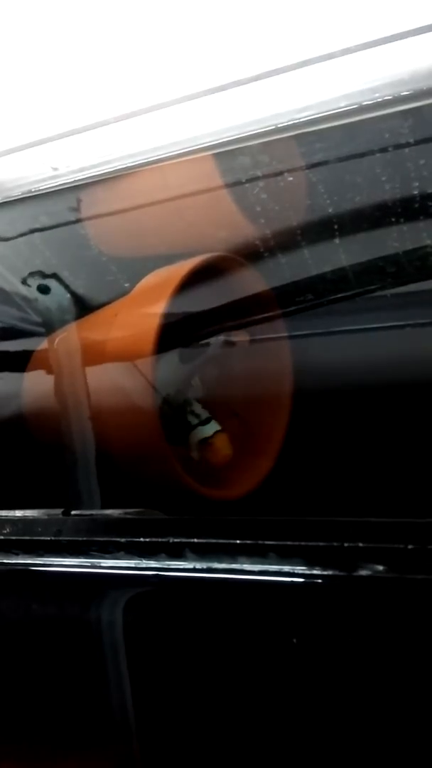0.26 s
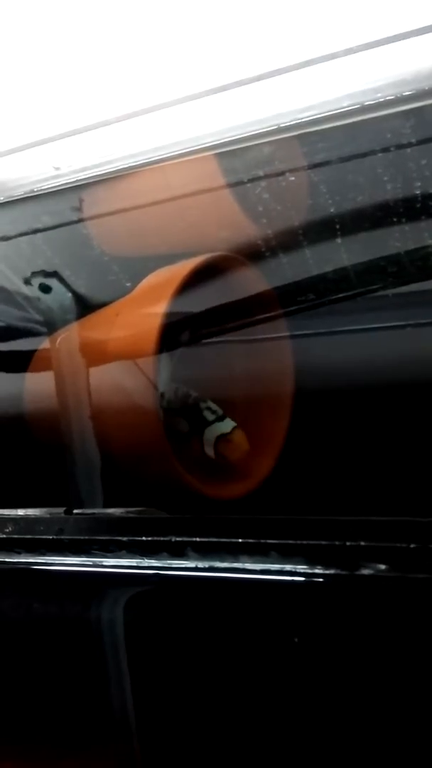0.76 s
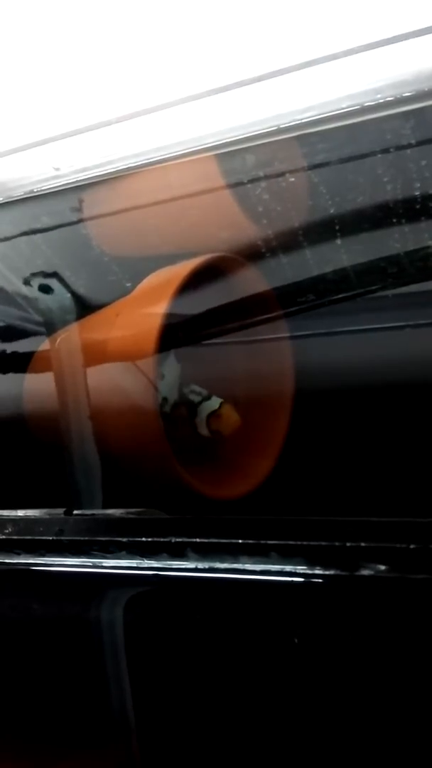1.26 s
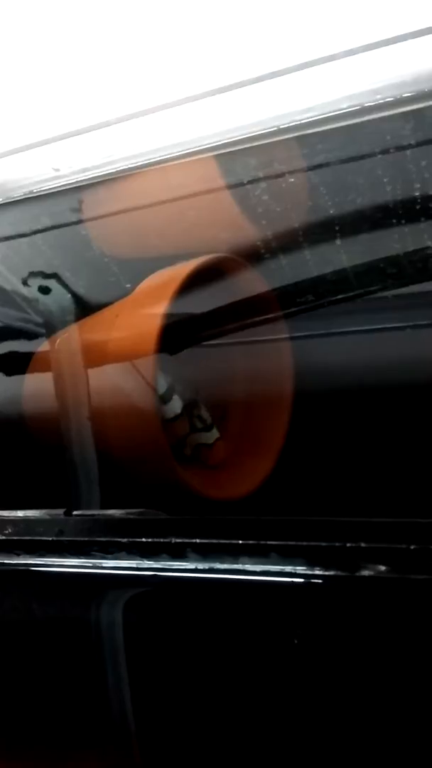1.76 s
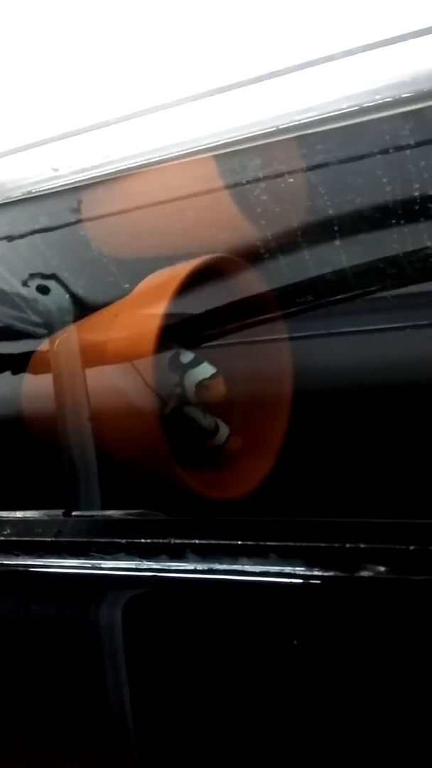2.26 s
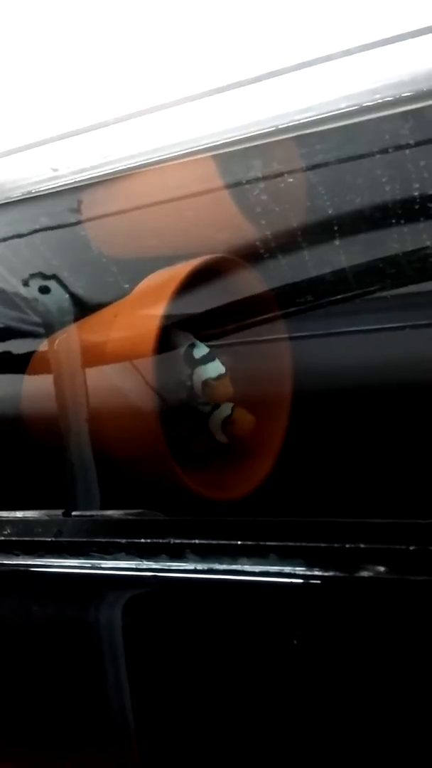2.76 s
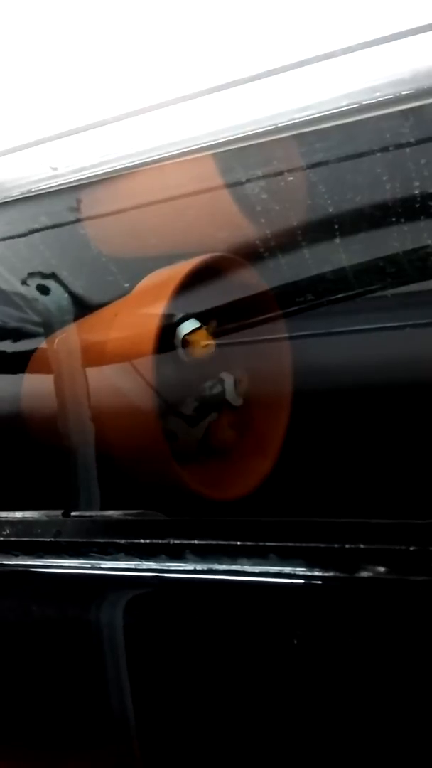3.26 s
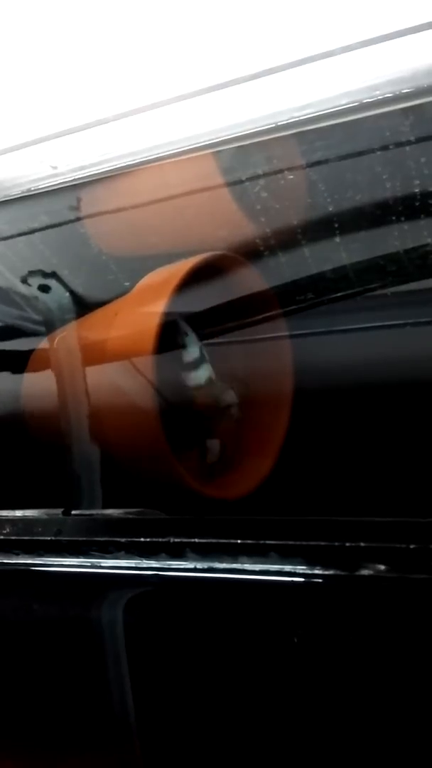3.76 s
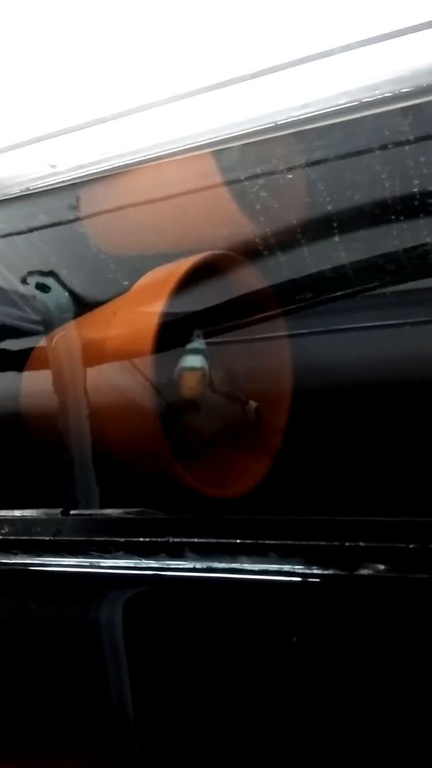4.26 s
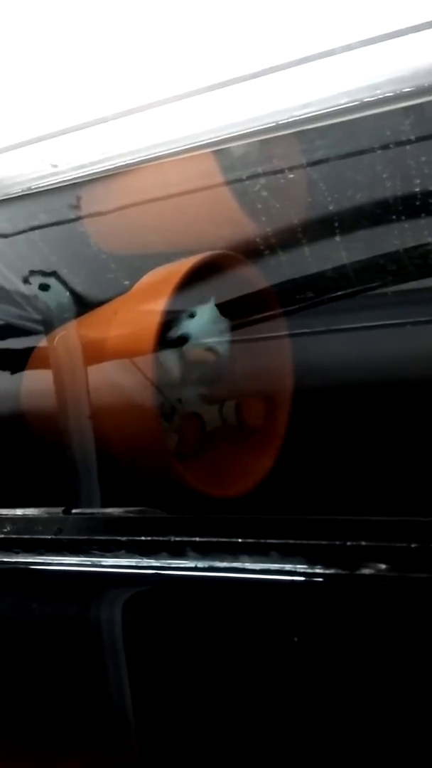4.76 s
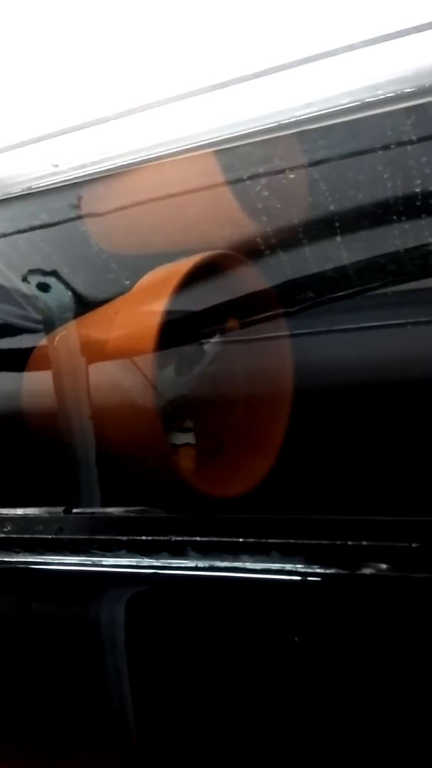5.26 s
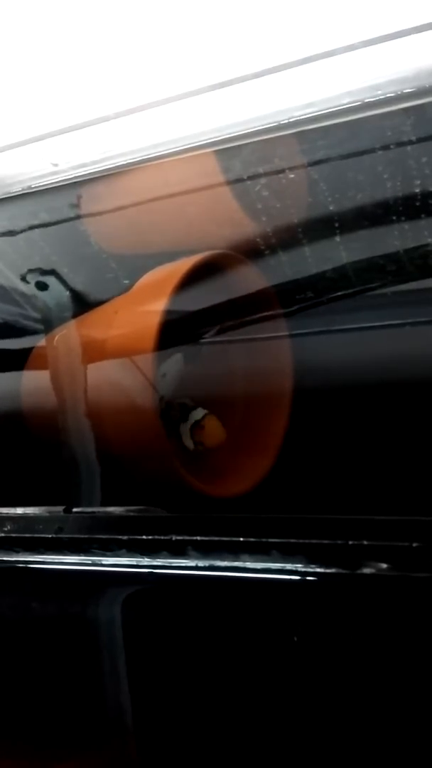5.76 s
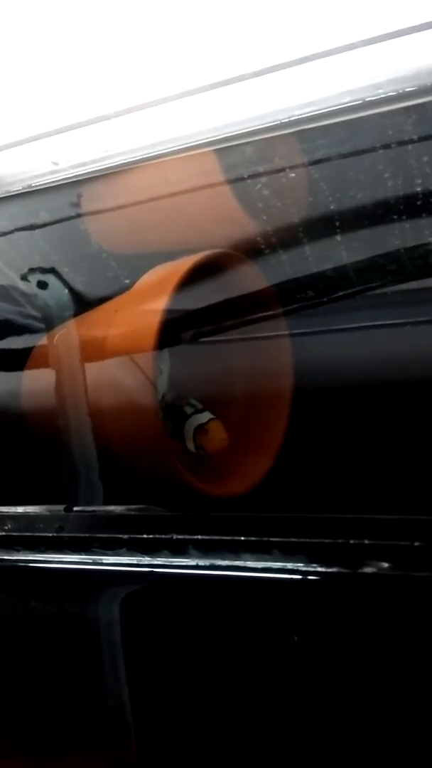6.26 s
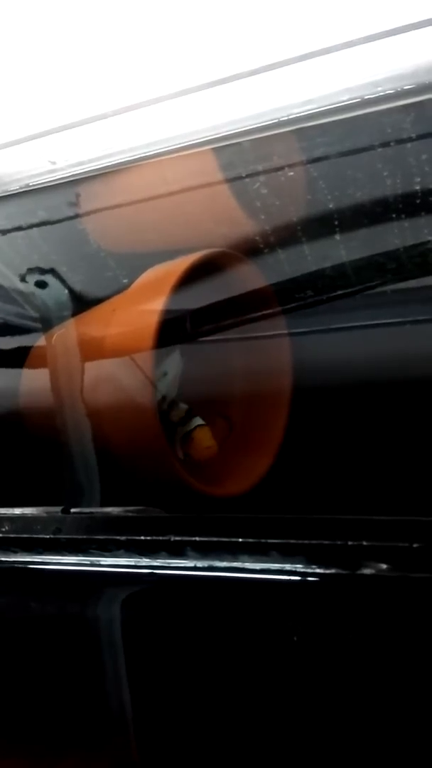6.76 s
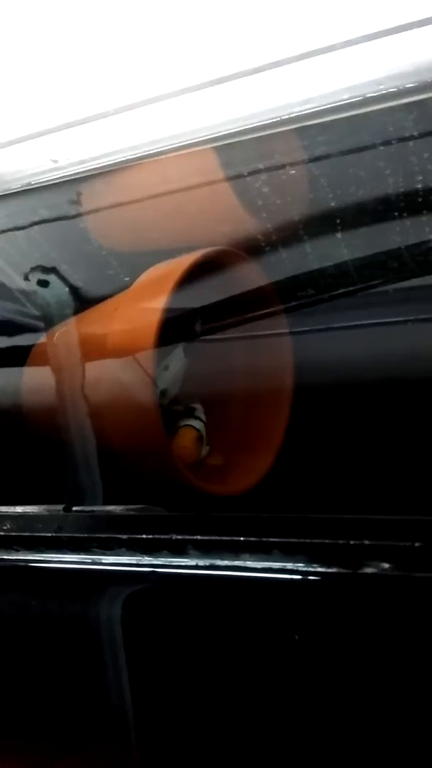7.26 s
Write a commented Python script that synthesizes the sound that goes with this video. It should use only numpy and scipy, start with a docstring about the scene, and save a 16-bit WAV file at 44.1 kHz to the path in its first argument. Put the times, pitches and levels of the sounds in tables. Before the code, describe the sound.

Bubbling return water plops and gurgles under an aquarium hood, bright drips and spray at right, over a steady, fluttering low pump hum.

```python
"""Water returning to a fish tank indoors, heard close by: bubbles of all sizes slosh, gurgle and fizz.
Each bubble is a decaying resonance; single plops, gulps, drips and spits of spray stand out,
and the tank, the air under the hood and the outlet ring with them.
Behind the water two pumps hum at slightly different speeds and beat about eight times a second.
A noise gate lowers low levels, as at troughs of the beat; further brief dips lower the water and the hum."""
import sys
import numpy as np
from scipy import signal
from scipy.fft import rfft, irfft, next_fast_len
from scipy.io import wavfile
from scipy.ndimage import uniform_filter1d

SR = 44100
rng = np.random.default_rng(int(sys.argv[2]) if len(sys.argv) > 2 else 0)


def waveform_to_disk(signal):
    """Save audio, clipped to [-1, 1], as 16-bit WAV at the path in sys.argv[1]."""
    frames = np.transpose(np.atleast_2d(signal))
    scaled = np.clip(frames, -1, 1) * 32767
    samples = np.round(scaled).astype(np.int16)
    wavfile.write(sys.argv[1], SR, samples)


N = 331191
TIME = np.arange(N) / SR


def from_db(db):
    """Logarithmic level: decibels to amplitude gain."""
    return 10 ** (np.asarray(db) / 20)


def rms_one(x):
    """Normalisation by power: the mean of the channels gets rms 1."""
    return x / np.sqrt(np.mean(np.atleast_2d(x).mean(0) ** 2) + 1e-20)


def in_time(rows):
    """Linear interpolation: each column of a curve at every sample."""
    seconds, *columns = np.transpose(rows)
    return [np.interp(TIME, seconds, column) for column in columns]


def pan(db):
    """Level difference between the sides (positive is left), as gains with a mean of 1."""
    gains = from_db(np.array([[.5], [-.5]]) * db)
    return gains / gains.mean(0)


def colour(x, spectrum, balance=((1000, 0),)):
    """Linear filtering by spectrum: a smooth equaliser and a left-right balance, both by frequency."""
    size = next_fast_len(N + 4096, real=True)
    log_hz = np.log(np.maximum(np.arange(size // 2 + 1) * SR / size, 1))

    def curve(points):
        hz, db = np.array(points).T
        return np.interp(log_hz, np.log(hz), db)
    gain = from_db(curve(spectrum)) * pan(curve(balance))
    return irfft(rfft(x, size) * gain, size)[:, :N]


def drift(rate):
    """Low-passed noise: random wandering with rms 1; rate is the corner of both poles in Hz."""
    step = 40   # samples between the computed points
    r = np.exp(-2 * np.pi * rate * step / SR)
    noise = rng.standard_normal(N // step + 2002)
    slow = signal.lfilter([1], [1, -2 * r, r * r], noise)[2000:]   # skip the settling
    return np.interp(np.arange(N) / step, np.arange(len(slow)), rms_one(slow))


def resonate(x, hz, width):
    """Damped resonance: a band of the given width in Hz, with gain 1 on top."""
    r = np.exp(-np.pi * width / SR)
    feedback = [1, -2 * r * np.cos(2 * np.pi * hz / SR), r * r]
    return signal.lfilter(np.array([1, 0, -1]) * (1 - r * r) / 2, feedback, x + 1e-18)


def body(x, modes, direct):
    """Modal superposition: a share of direct sound plus the ringing of the modes."""
    return direct * x + sum(from_db(db) * resonate(x, hz, width) for hz, width, db in modes)


HOOD_T60_S = 0.2


def hood(x, wet_db):
    """Diffuse reverberation: dense reflections between water, glass and hood, different at each side."""
    t = TIME[:SR // 4]
    decay = from_db(-60 * t / HOOD_T60_S) * (t > .002)
    echoes = rng.standard_normal((2, len(t))) * decay
    echoes /= np.sqrt(np.sum(echoes ** 2, axis=1, keepdims=True))
    return x + from_db(wet_db) * signal.fftconvolve(np.atleast_2d(x), echoes, axes=1)[:, :N]


# The flow moves from splashing at the surface to gurgling deeper under the hood.
# Each row: time in seconds, share of deep sound from 0 to 1.
DEPTH = [(0, 0), (2.35, 0), (2.65, 0.92), (7.5, 1)]
# Resonances of the air under the hood for bursts at the surface, then for deep ones.
# Each row: frequency in Hz, width in Hz, gain in dB.
SPLASH_MODES = [(450, 85, 0), (510, 22, 3.5), (610, 22, -16), (775, 65, -4.5), (1020, 19, -4),
                (1150, 78, -2), (1250, 64, -3.5), (1373, 31, -7), (1450, 39, 0), (1560, 21, -21),
                (2268, 177, -3), (2444, 310, -16.5), (2890, 72, -6.5), (3250, 94, -10)]
GURGLE_MODES = [(504, 77, -7.5), (596.4, 25, 3.5), (745, 41, -9.5), (809, 32, 1.5), (944, 23, -6),
                (1020, 25.5, 3.5), (1156, 53, -11), (1250, 36, 0), (1558, 38, 0), (1740, 56, -4.5),
                (2224, 46, -2.5), (2477, 133, -4.5), (2825, 130, -8.5), (3320, 50, -15)]


def air_space(x, direct):
    """Cavity resonance: the air under the hood rings with modes set by how deep the bubbles burst."""
    deep = np.clip(in_time(DEPTH)[0], 0, 1)
    splash = body(x, SPLASH_MODES, direct)
    gurgling = body(x, GURGLE_MODES, direct)
    return np.sqrt(1 - deep) * splash + np.sqrt(deep) * gurgling   # equal-power crossfade


ARRIVAL_SPREAD_S = .00025   # bubbles burst all over the surface: largest time difference of the sides


def bubbles(per_s, spread_db, clump_db, low_hz, high_hz, cycles, count=22):
    """Random impulses exciting resonances: clumped bubbles, each swelling and ringing at its own pitch."""
    born = np.flatnonzero(rng.random(N) < per_s * from_db(clump_db * drift(14)) / SR)
    size, sign, pitch, place = rng.random((len(born), 4)).T
    sizes = from_db(spread_db * np.minimum(-np.log(1 - size), 3.5)) * np.sign(sign - .5)
    delay = np.round((2 * place - 1) * ARRIVAL_SPREAD_S * SR).astype(int)
    at_right = np.clip(born + delay, 0, N - 1)
    out = np.zeros((2, N))
    for k, hz in enumerate(np.geomspace(low_hz, high_hz, count)):
        mine = (pitch * count).astype(int) == k
        clicks = np.zeros((2, N))
        clicks[0, born[mine]] = sizes[mine]
        clicks[1, at_right[mine]] = sizes[mine]
        width = np.log(1000) / np.pi * hz / cycles   # each resonance falls 60 dB in these cycles
        out += resonate(resonate(clicks, hz, width), hz, width)   # twice: a round onset without a click
    return rms_one(out)


def single_bubbles(rows, swell_s, glide, snap):
    """Bubble oscillation: each swells, rings and dies with rising pitch; the torn film snaps as noise."""
    out, t = np.zeros((2, N + SR)), TIME[:SR // 6]
    shape = (t / swell_s) ** 2 * np.exp(-2 * t / swell_s)   # loudest after swell_s
    for s, db, hz, side_db in rows:
        pitch = hz * (1 + glide * (np.tanh(t / swell_s / 2) - .5))
        band = signal.butter(3, [hz * .85, min(hz * 1.3, SR / 3)], "band", fs=SR, output="sos")
        film = rms_one(signal.sosfilt(band, rng.standard_normal(len(t))))
        tone = np.sin(2 * np.pi * np.cumsum(pitch) / SR)
        ring = shape * (tone + snap * film)
        start = max(round(s * SR), 0)
        out[:, start:start + len(t)] += from_db(db) * pan(side_db) * ring / np.abs(ring).max()
    return out[:, :N]


def blips(per_s, low_hz, high_hz, spread_db, swell_s):
    """Random scatter of bubble oscillations: clear pitches of random size and place."""
    when, size, pitch, place = rng.random((int(per_s * N / SR), 4)).T
    hz = low_hz * (high_hz / low_hz) ** pitch
    rows = np.c_[when * N / SR, spread_db * size, hz, 10 * (place - .5)]
    return rms_one(single_bubbles(rows, swell_s, glide=0.13, snap=0.11))


def crackle(per_s, spread_db):
    """Random impulse noise: sharp ticks of the finest droplets, uneven in size."""
    sizes = from_db(spread_db * np.minimum(rng.exponential(1, N), 4)) * rng.choice([-1, 1], N)
    return rms_one(sizes * (rng.random(N) < per_s / SR))


# Slow course of the pump hum. Each row: time in seconds, level in dB before the overall trim.
HUM = [(0, -47), (.85, -50), (1.15, -52), (1.55, -48), (2.2, -51.5), (2.55, -48), (3.45, -48.5),
       (3.73, -43.5), (3.97, -49), (4.2, -46.5), (4.65, -46.5), (5.0, -44.5), (5.45, -44.5), (7.5, -46.5)]
# Mains buzz of the motors. Each row: multiple of the mains frequency, level in dB against the main rotor.
BUZZ = [(2, -12), (3, -12), (6, -17.5), (17, -31), (26, -31)]
MAIN_PUMP_HZ, SECOND_PUMP_HZ, MAINS_HZ = 168.86, 160.503, 60.01
IN_STEP_S = .083   # a moment when the unslipped tones coincide
ROTOR_SLIP = .3   # rms waver of the rotors' phase in radians


def pumps(level_db=2.0, second_db=-4.5, flutter_db=1.5):
    """Beating of two near tones: rotors wavering under their load, over the mains buzz."""
    def tone(hz, slip=0):
        return np.sqrt(2) * np.cos(2 * np.pi * hz * (TIME - IN_STEP_S) + slip)
    slip = ROTOR_SLIP * drift(5.2)   # shared by both rotors
    rotors = tone(MAIN_PUMP_HZ, slip) + from_db(second_db) * tone(SECOND_PUMP_HZ, slip)
    buzz = sum(from_db(db + 1.86 * drift(5.2)) * tone(round(k) * MAINS_HZ) for k, db in BUZZ)
    hum_db = in_time(HUM)[0] + level_db + flutter_db * drift(8.9)
    return from_db(hum_db) * (rotors + buzz) * pan(0.87)


# Resonances of the outlet. Each row: frequency in Hz, width in Hz, gain in dB.
OUTLET_MODES = [(3410, 200, -2), (4020, 320, -2), (4380, 470, -7.5), (5520, 71, -4.5), (7510, 76, -3.5)]
# Spectrum of the spray. Each row: frequency in Hz, gain in dB.
FIZZ_SPECTRUM = [(2200, 1.5), (3400, -8.5), (4200, -9), (5200, -6.5), (6500, -6.5), (7500, -4.5),
                 (8600, -4.5), (9500, -9.5), (12000, -9), (15500, -18)]
# Place of the spray. Each row: frequency in Hz, left minus right in dB.
FIZZ_BALANCE = [(2500, -2.5), (4200, -5), (5500, -11.5), (8000, -13.5), (10000, -13), (11500, -5.5),
                (15000, -6.5)]


def at_outlet(x):
    """Resonance and level difference: colour and place of the spray at the outlet on the right."""
    return colour(body(x, OUTLET_MODES, direct=1), FIZZ_SPECTRUM, FIZZ_BALANCE)


# The outlet spits a pinch of spray.
# Each row: start in seconds, peak in dB of the shower's envelope before hood, outlet and trim.
SPITS = [(.122, -53), (.548, -43.5), (.597, -49), (1.654, -45.5), (2.685, -64), (3.047, -53), (3.072, -61),
         (4.129, -45.5), (5.906, -52), (6.025, -44), (6.8, -49), (7.072, -47.5), (7.333, -41.5)]
SPIT_S = 0.0044   # time a spit takes to peak


def spits():
    """Impulse noise under an envelope: each spit is a quick shower of droplets that thins out."""
    strength = np.zeros(N)
    for s, db in SPITS:
        age = np.clip((TIME - s) / SPIT_S, 0, 20)
        strength += from_db(db) * age * np.exp(1 - age)
    shower = strength * crackle(per_s=4600, spread_db=6.0)
    return from_db(4.5) * at_outlet(hood(shower, wet_db=3.5))


# The loudest drips, each trapping a tiny bubble. Each row: start in seconds, peak in dB of the bare
# bubble before the outlet, hood and trim, middle pitch in Hz, left minus right in dB.
DRIPS = [(0.5488, -25, 4220, -6), (0.5476, -27, 5860, -18), (0.585, -39, 4640, -10),
         (0.6248, -22.5, 4470, -7.5), (0.848, -43, 5540, -15), (0.8864, -36, 5200, -12),
         (0.9494, -37, 5500, -18), (0.9944, -34.5, 5520, -16), (1.304, -44, 5560, -13),
         (1.387, -41.5, 5600, -13), (1.579, -41.5, 4340, -6), (1.652, -39, 3980, -3),
         (1.84, -41.5, 6900, -13), (1.861, -35.5, 2970, -2), (1.955, -46, 3900, -5), (1.995, -46, 4360, -8),
         (2.2009, -33, 6760, -16), (2.359, -37, 6430, -15), (2.686, -45, 4280, -8), (2.704, -53, 4260, -4),
         (2.829, -37.5, 7310, -20), (2.947, -41, 5040, -18), (3.3282, -40.5, 4380, -17),
         (3.705, -42.5, 7900, -20), (4.4792, -41, 4800, -14), (4.6218, -39, 4560, -11),
         (5.2482, -40.5, 4800, -14), (5.811, -42.5, 5600, -18), (5.923, -40.5, 7700, -20),
         (6.041, -47, 4350, -13), (6.8095, -34, 5520, -11), (7.255, -49, 4300, -6),
         (7.284, -34.5, 5240, -24), (7.288, -44.5, 4100, -9), (7.366, -39.5, 5020, -12),
         (7.484, -47, 4430, -9)]


def drips():
    """Oscillation of trapped bubbles: drops fall near the outlet with a short, bright clack."""
    rings = single_bubbles(DRIPS, swell_s=0.0024, glide=0.14, snap=0.45)
    return from_db(1.5) * hood(body(rings, OUTLET_MODES, direct=0.74), wet_db=-3.5)


# Big gulps of air. Each row: start in seconds, peak in dB, middle pitch in Hz, left minus right in dB.
GULPS = [(.08, -42.5, 509, -5), (.565, -38, 430, -4), (.785, -48, 514, 0), (.875, -52, 350, -3),
         (.885, -45, 83.5, 1), (.925, -43, 450, 2), (1.015, -39.5, 421, 3), (1.545, -38.5, 428, -3),
         (1.585, -35, 322, -3), (1.66, -38.5, 381, 1), (1.72, -41, 325, 0), (1.97, -41.5, 452, -5),
         (2.105, -41, 433, -6), (2.145, -40.5, 480, -3), (2.21, -48, 510, -4), (2.29, -43, 512, -12),
         (2.35, -39, 502, -9), (2.44, -45.5, 517, -4), (2.475, -43, 73, 2)]


def gulps():
    """Low bubble oscillation: big gulps of air swell slowly and hardly glide."""
    return single_bubbles(GULPS, swell_s=0.013, glide=0.012, snap=0.27)


# The loudest large bubbles bursting. Each row: start in seconds, peak in dB of the bare bubble
# before the air space, hood and trim, middle pitch in Hz, left minus right in dB.
PLOPS = [(0.037, -33.5, 1338, 0), (0.191, -37, 1246, 4), (0.243, -30.5, 2890, 1), (0.293, -28.5, 2850, 3),
         (0.303, -34.5, 1260, 2), (0.348, -35.5, 2230, 4), (0.478, -31, 1370, 4), (0.48, -30.5, 2860, 3),
         (0.515, -34, 2160, -9), (0.661, -35.5, 1380, -3), (0.744, -31.5, 1370, -1), (0.831, -27, 1255, -1),
         (0.833, -28, 2360, -1), (0.884, -32, 726, -1), (1.122, -38.5, 2390, -1), (1.128, -39.5, 1450, -12),
         (1.192, -34, 1420, -8), (1.393, -25.5, 2945, -2), (1.639, -34.5, 1347, -4), (1.81, -32, 2250, -3),
         (1.837, -33, 780, 1), (1.86, -30, 1285, -3), (2.039, -41, 2350, -3), (2.093, -38, 1450, -11),
         (2.148, -41, 1310, -4), (2.36, -39, 1450, -9), (2.384, -50, 2440, 2), (2.408, -36, 1430, -6),
         (2.409, -40, 2490, -9), (2.412, -42, 1170, 5), (2.424, -44, 1360, -3), (2.449, -35, 1450, -3),
         (2.529, -38.5, 1070, -6), (2.622, -37, 1500, 1), (2.688, -38, 1020, -7), (3.044, -46.5, 1190, -6),
         (3.175, -37.5, 1020, -7), (3.295, -40, 2390, -24), (3.414, -42.5, 1020, -5),
         (3.596, -35.5, 1190, 0), (3.607, -37.5, 2260, -19), (3.768, -38, 2020, 11), (3.99, -38, 2440, -6),
         (4.08, -40.5, 2200, -17), (4.107, -31, 1460, 0), (4.272, -36, 2490, -17), (4.326, -33, 2080, -4),
         (4.358, -43, 830, 5), (4.573, -31.5, 1450, -10), (4.592, -35.5, 1560, 3), (4.64, -41, 1250, -2),
         (4.908, -38.5, 1560, 0), (5.046, -35, 2500, -7), (5.118, -40, 1220, -5), (5.148, -34.5, 1250, 0),
         (5.16, -47, 1560, 1), (5.368, -36.5, 1070, 1), (5.431, -36, 1260, -1), (5.455, -35, 1020, -3),
         (5.456, -36.5, 2300, -4), (5.457, -36, 726, 0), (5.478, -39, 2550, -12), (5.497, -37, 1460, -7),
         (5.811, -38.5, 1590, -2), (5.92, -37.5, 2200, -12), (5.939, -40, 770, -3), (6.011, -37, 760, 0),
         (6.082, -35, 2700, 4), (6.099, -34.5, 800, -4), (6.134, -32, 870, 1), (6.281, -38, 2300, -18),
         (6.637, -34, 930, -16), (6.756, -40.5, 830, 1), (7.06, -37.5, 2430, -7), (7.068, -42, 856, -3),
         (7.177, -37, 1020, -9), (7.198, -39, 2440, -6), (7.202, -36.5, 1690, -13), (7.248, -39, 778, 4),
         (7.285, -38.5, 930, -10), (7.335, -34, 1780, 1), (7.336, -36, 2400, -3), (7.359, -37.5, 1570, -12),
         (7.371, -38, 783, 1), (7.48, -36.5, 1560, -1)]


def plops():
    """Bubble oscillation exciting a cavity: large bubbles burst at the surface and ring the hood."""
    bursts = single_bubbles(PLOPS, swell_s=0.0027, glide=0.09, snap=0.35)
    return from_db(0.5) * hood(air_space(bursts, direct=0.44), wet_db=0.0)


# Resonances of the tank. Each row: frequency in Hz, width in Hz, gain in dB.
TANK_MODES = [(142.7, 22, 7), (219.8, 37, 6), (322, 12.5, 9.5), (340.5, 16, 6.5)]
# Spectra of the slosh and of the churn. Each row: frequency in Hz, relative gain in dB.
SLOSH_SPECTRUM = [(25, -30), (45, -17), (60, -6.5), (90, -3.5), (130, -9), (165, -5.5), (220, -1),
                  (300, -4.5), (420, -12), (520, -9.5), (750, -27)]
CHURN_SPECTRUM = [(25, -20), (45, -2), (60, 17), (90, 15), (130, -21), (220, -6)]


def slosh(churn_db=-13.0):
    """Forced modal vibration: big air pockets shake the tank; surface splashing adds a low churn."""
    pockets = bubbles(per_s=600, spread_db=2.0, clump_db=2.5, low_hz=48.1, high_hz=650, cycles=5.94)
    shaken = body(pockets, TANK_MODES, direct=0.69)
    tank = rms_one(colour(hood(shaken, wet_db=-7.5), SLOSH_SPECTRUM))
    churn = rms_one(colour(hood(pockets, wet_db=-14), CHURN_SPECTRUM))
    at_surface = 1 - in_time(DEPTH)[0]
    return (tank + from_db(churn_db) * at_surface * churn) * pan(1.0)


# Spectrum of the gurgle. Each row: frequency in Hz, relative gain in dB.
GURGLE_SPECTRUM = [(250, -20), (430, -2), (800, -0.5), (1300, 1.5), (2350, 2), (3700, -2.5), (6000, 17.5)]


def gurgle():
    """Cavity excitation: middling bubbles in quick succession, with clear blips, ring the air under the hood."""
    pops = bubbles(per_s=1100, spread_db=2.8, clump_db=2.2, low_hz=370, high_hz=4000, cycles=18.0, count=30)
    clear = blips(per_s=120, low_hz=450, high_hz=3100, spread_db=10, swell_s=.0035)
    ringing = hood(air_space(pops + clear, direct=0.16), wet_db=0.5)
    return rms_one(colour(ringing, GURGLE_SPECTRUM) * pan(-2.7))


def fizz(hiss_db=9.0, crackle_db=-3.5):
    """Dense random bursts: tiny bubbles tinkle and droplets crackle at the outlet, over a fine hiss."""
    pops = bubbles(per_s=2600, spread_db=5.0, clump_db=2.5, low_hz=2564, high_hz=9300, cycles=22.0)
    tinkle = from_db(-4) * blips(per_s=70, low_hz=3700, high_hz=9500, spread_db=12, swell_s=.002)
    ticks = from_db(crackle_db) * crackle(per_s=2600, spread_db=4.3)
    hiss = from_db(hiss_db) * rng.standard_normal((2, N))
    return rms_one(at_outlet(hood(pops + tinkle + ticks, wet_db=0.5) + hiss))


# The level of the water and the hum dips briefly.
# Each row: time of the dip's centre in seconds, depth in dB (negative is a rise).
DIPS = [(0.163, 2.5), (0.274, 6), (1.343, 2.5), (1.936, 4), (2.078, 1.5), (2.18, -1.5), (2.669, 9),
        (2.774, 3), (2.901, 3), (3.024, 11.5), (3.135, 12.5), (3.256, 3.5), (3.388, 6.5), (3.534, 6),
        (4.442, 6), (4.705, 9), (5.322, 8.5), (5.651, 7.5), (6.247, 7), (6.51, 6), (7.462, 3)]


def level_dips(fall_s=0.026, return_s=0.02):
    """Amplitude modulation: the level sinks into each dip and returns abruptly."""
    gain_db = np.zeros(N)
    for s, depth_db in DIPS:
        before = ((TIME - s) / fall_s) ** 2
        after = ((TIME - s) / return_s) ** 4
        away = np.where(TIME < s, before, after)
        gain_db -= depth_db * np.exp(-np.minimum(away, 20))
    return from_db(gain_db)


# The water heaves up and falls back.
# Each row: time of the peak in seconds, rise of the slosh in dB.
SURGES = [(.88, 10), (1.6, 3), (2.0, 9), (2.38, 3), (2.75, 5.5), (3.65, 1.5), (4.12, 2), (5.15, 1),
          (5.48, 1.5), (6.05, 3.5), (7.33, 0.5)]
SURGE_S = 0.074   # time a surge takes to rise, and to fall (to 1/e of its dB)
RIPPLE_DB, RIPPLES_PER_S = 1.58, 4.8   # small random unevenness of the flow: rms, corner in Hz


def heave():
    """Level modulation in dB: bell-shaped surges over small ripples."""
    surges = sum(db * np.exp(-np.minimum(((TIME - s) / SURGE_S) ** 2, 20)) for s, db in SURGES)
    return surges + RIPPLE_DB * drift(RIPPLES_PER_S)


# Strength of the return flow between surges. Each row: time in seconds, then the levels
# of slosh, gurgle and fizz in dB before their trims.
WATER = [(0, -49, -46, -52), (.2, -53, -44, -50.5), (.5, -55, -45.5, -51), (.75, -54, -46, -54),
         (1.15, -52.5, -45.5, -52), (1.55, -50, -46, -54), (1.9, -58, -48, -56.5),
         (2.25, -58, -52.5, -55.5), (2.6, -51.5, -48, -54), (3.06, -55, -50.5, -56.5),
         (3.25, -50, -45.5, -60), (3.5, -49.5, -48, -56), (5.15, -47.5, -47.5, -57), (5.65, -52, -47, -54),
         (6.05, -49.5, -47, -55), (6.75, -50.5, -47.5, -58), (7.5, -48, -46.5, -54)]
GURGLE_FOLLOWS, FIZZ_FOLLOWS = 0.41, 0.4   # shares of the heave in dB
SPUTTER_DB, SPUTTERS_PER_S = 1.5, 63   # the fizz comes in quick spurts: rms, corner in Hz
FIZZ_IN_DIP, HUM_IN_DIP = .8, 1   # shares of a dip's depth in dB


def running_water(slosh_trim_db=0.0, gurgle_trim_db=-2.5, fizz_trim_db=-0.47):
    """Common modulation: slosh, gurgle and fizz swell in surges, sink in brief level dips; the fizz sputters."""
    slosh_db, gurgle_db, fizz_db = in_time(WATER)
    heave_db, dips = heave(), level_dips()
    slosh_db = slosh_db + slosh_trim_db + heave_db
    gurgle_db = gurgle_db + gurgle_trim_db + GURGLE_FOLLOWS * heave_db
    fizz_db = fizz_db + fizz_trim_db + FIZZ_FOLLOWS * heave_db + SPUTTER_DB * drift(SPUTTERS_PER_S)
    return (dips * from_db(slosh_db) * slosh()
            + dips * from_db(gurgle_db) * gurgle()
            + dips ** FIZZ_IN_DIP * from_db(fizz_db) * fizz())


def scene():
    """Superposition of the pumps, the single bubbles, the spray and the running water."""
    hum = level_dips() ** HUM_IN_DIP * pumps()   # the hum dips in level as well
    return hum + spits() + drips() + gulps() + plops() + running_water()


def noise_gate(x, threshold_db=-39.5, slope=0.99, window_s=0.0081, lag_s=0.0052):
    """Downward expansion: the gain sinks, a little late, as the short-term level falls under the threshold."""
    power = uniform_filter1d(np.mean(x ** 2, axis=0), max(int(window_s * SR), 1))
    under_db = 10 * np.log10(np.abs(power) + 1e-12) - threshold_db
    gain_db = uniform_filter1d(np.clip(slope * under_db, -10, 0), size=400)   # 10 dB at most, smoothed
    return x * from_db(np.interp(TIME - lag_s, TIME, gain_db))


CUTOFF_HZ = 15750


def record(dry):
    """Expansion and band limiting: noise gate, then a steep cut of the top."""
    low_pass = signal.ellip(12, .1, 80, CUTOFF_HZ, fs=SR, output="sos")
    return signal.sosfilt(low_pass, noise_gate(dry))


dry = scene()
out = record(dry)
waveform_to_disk(out)
```